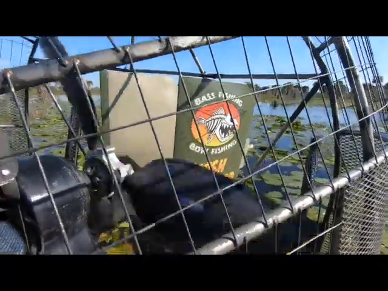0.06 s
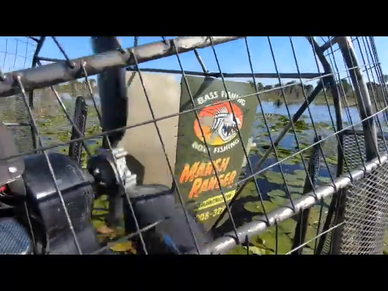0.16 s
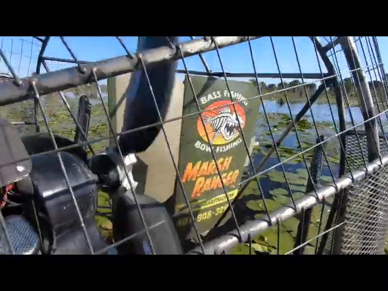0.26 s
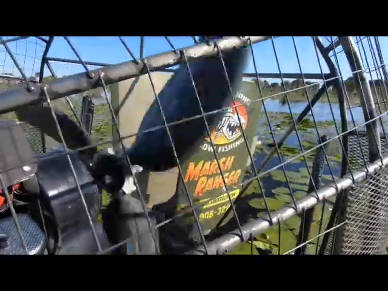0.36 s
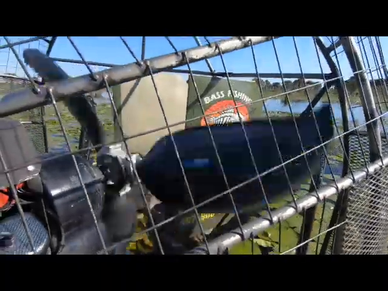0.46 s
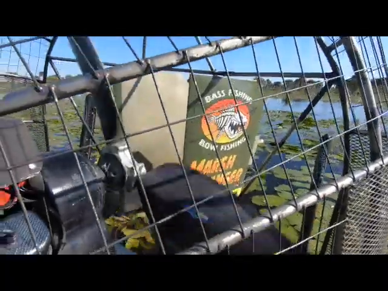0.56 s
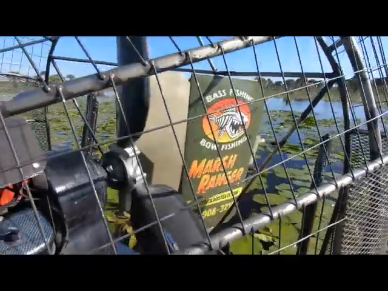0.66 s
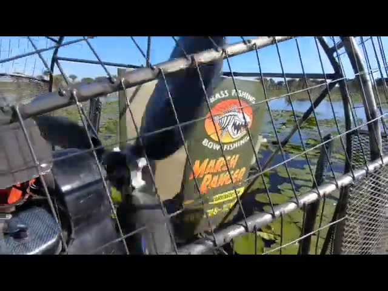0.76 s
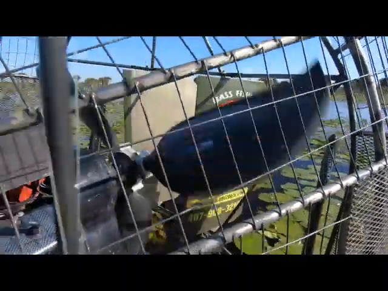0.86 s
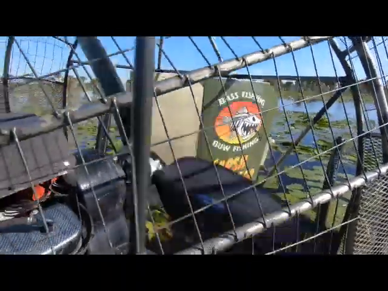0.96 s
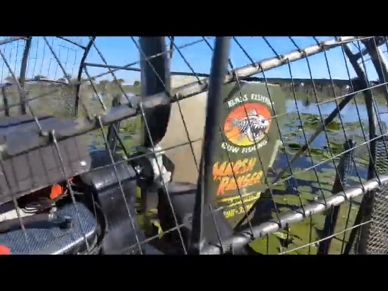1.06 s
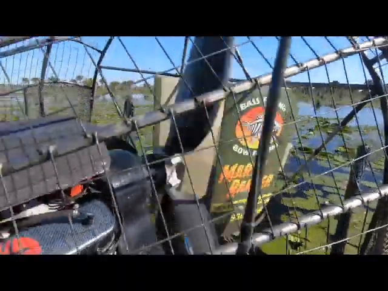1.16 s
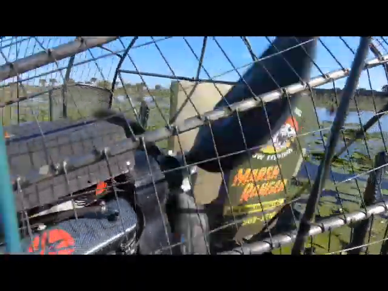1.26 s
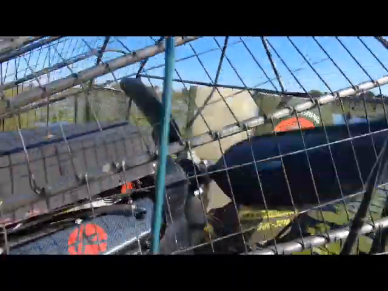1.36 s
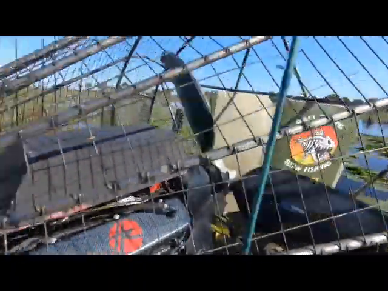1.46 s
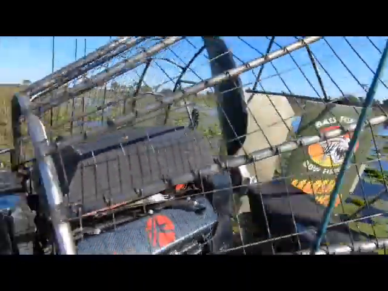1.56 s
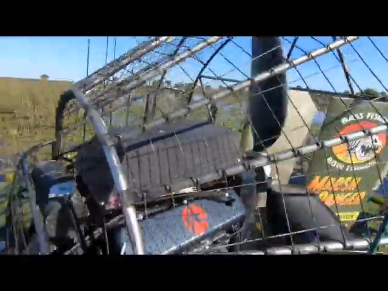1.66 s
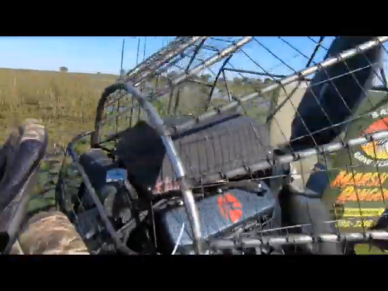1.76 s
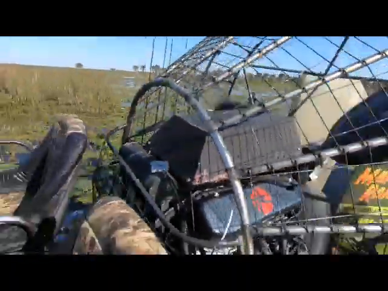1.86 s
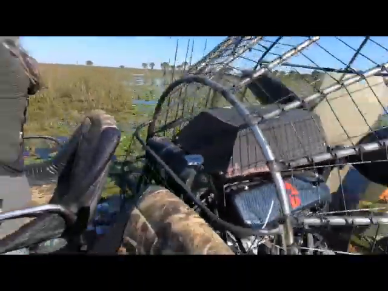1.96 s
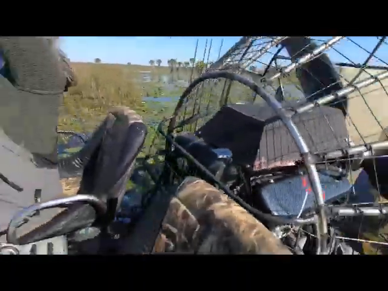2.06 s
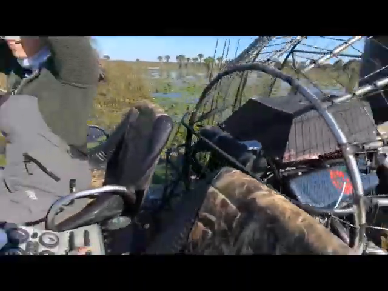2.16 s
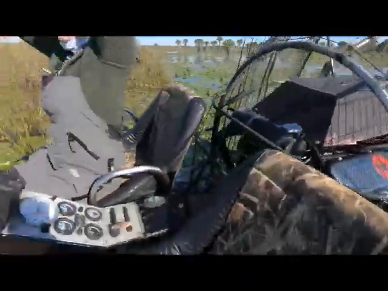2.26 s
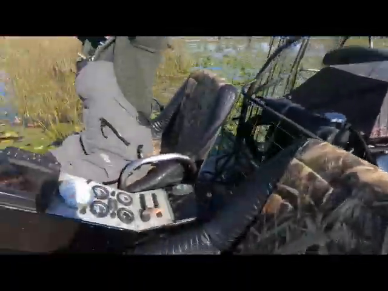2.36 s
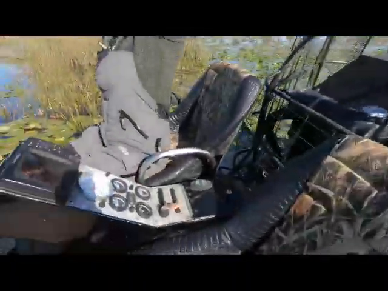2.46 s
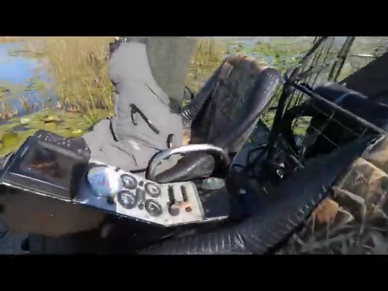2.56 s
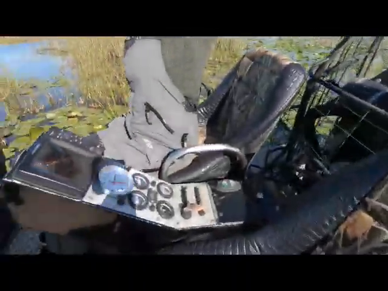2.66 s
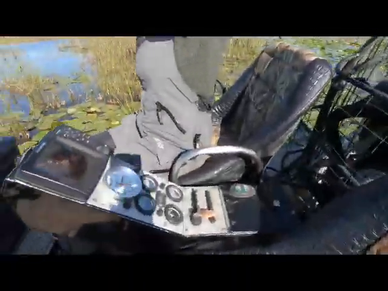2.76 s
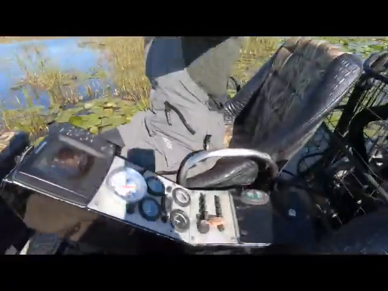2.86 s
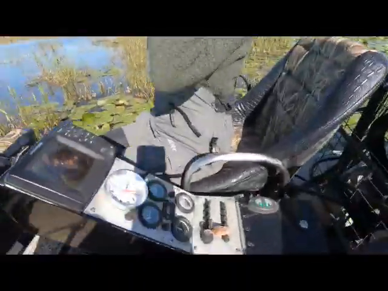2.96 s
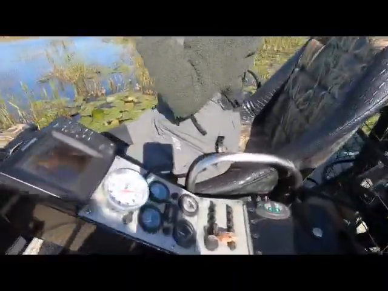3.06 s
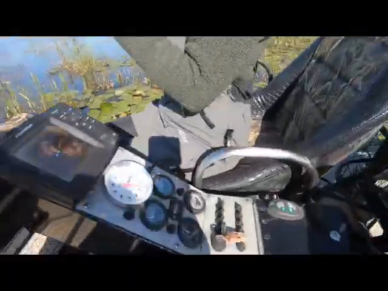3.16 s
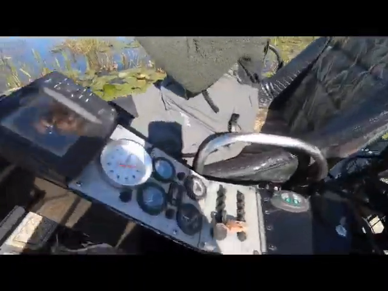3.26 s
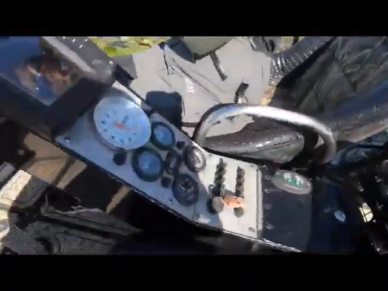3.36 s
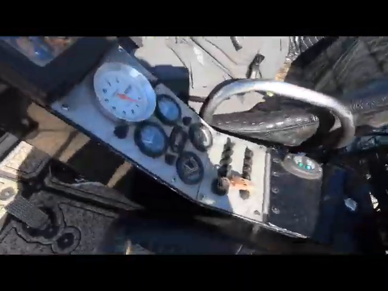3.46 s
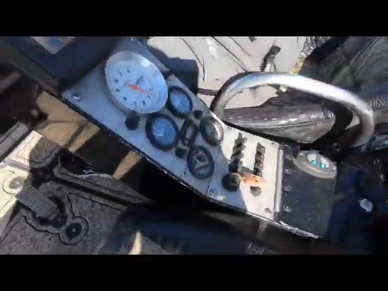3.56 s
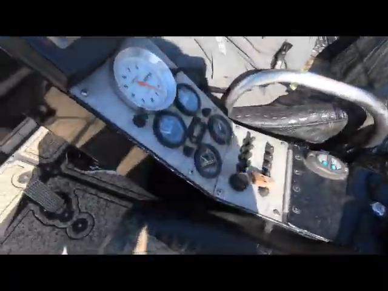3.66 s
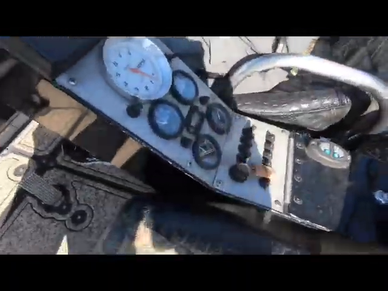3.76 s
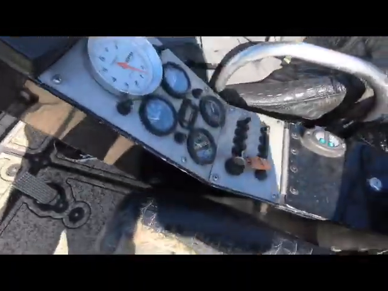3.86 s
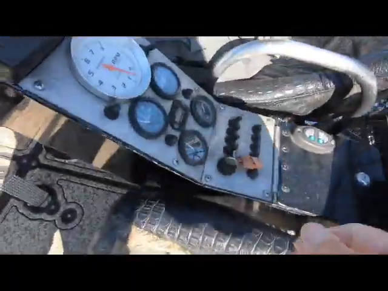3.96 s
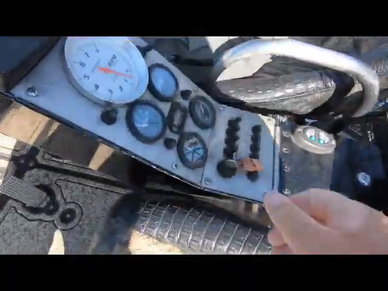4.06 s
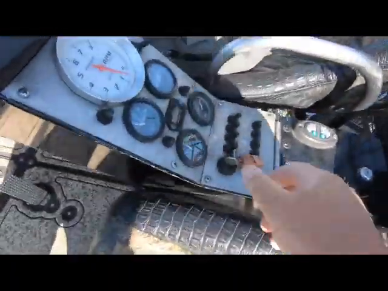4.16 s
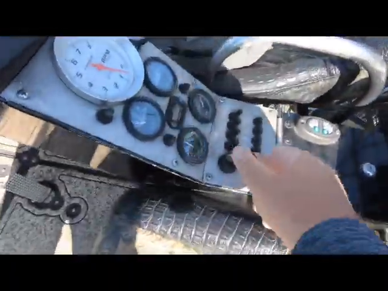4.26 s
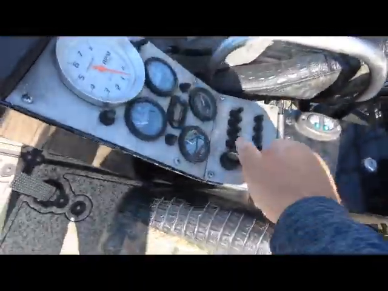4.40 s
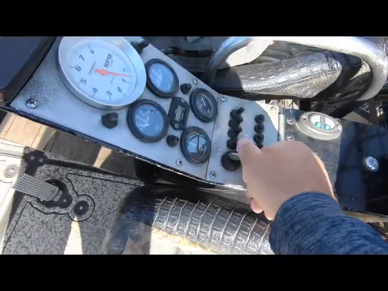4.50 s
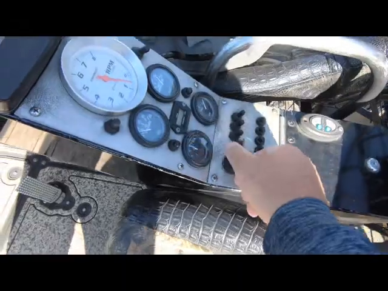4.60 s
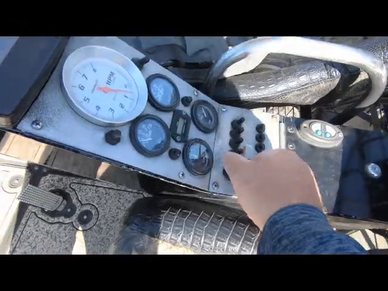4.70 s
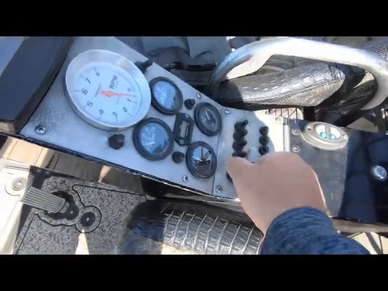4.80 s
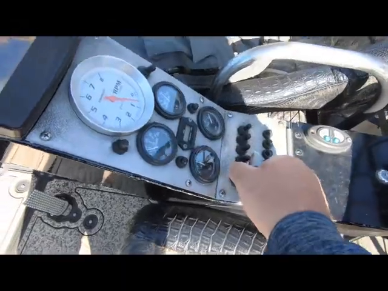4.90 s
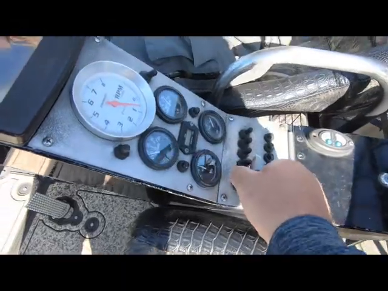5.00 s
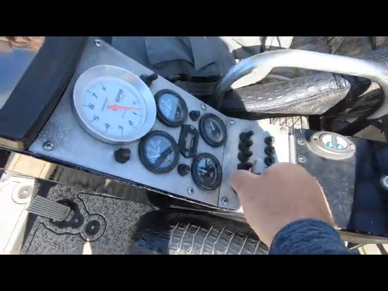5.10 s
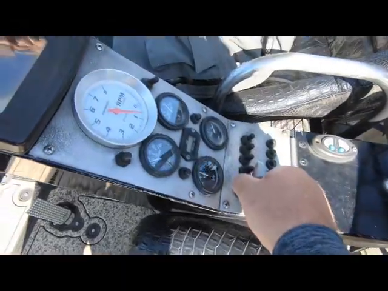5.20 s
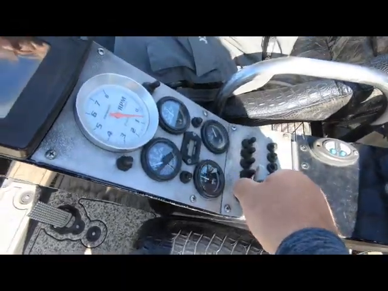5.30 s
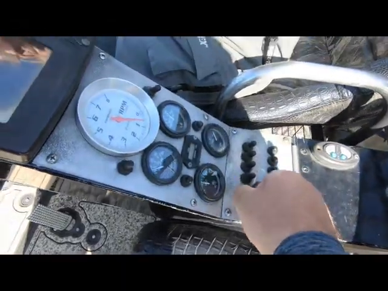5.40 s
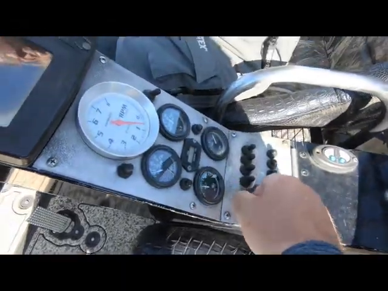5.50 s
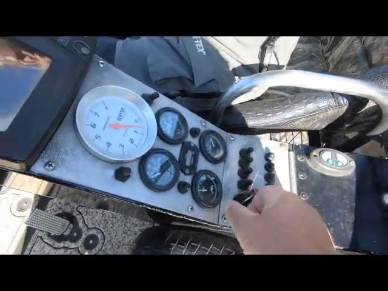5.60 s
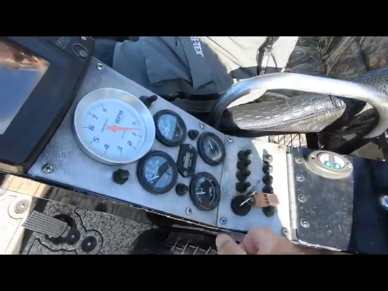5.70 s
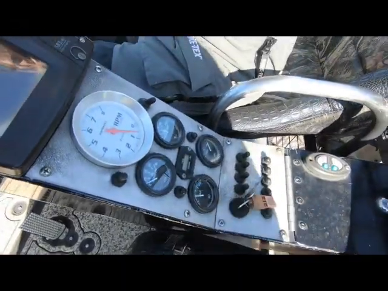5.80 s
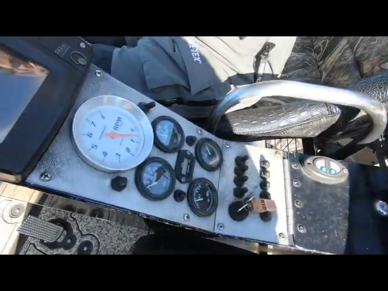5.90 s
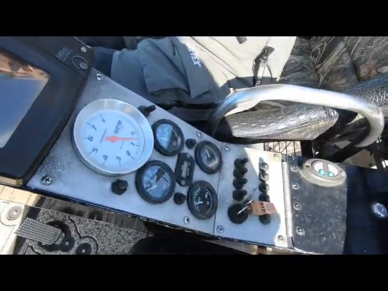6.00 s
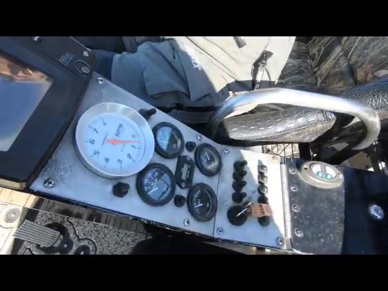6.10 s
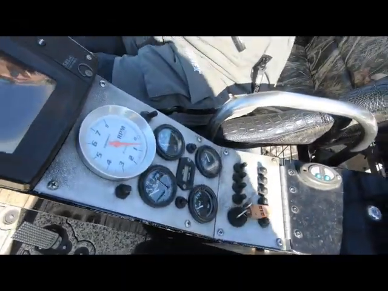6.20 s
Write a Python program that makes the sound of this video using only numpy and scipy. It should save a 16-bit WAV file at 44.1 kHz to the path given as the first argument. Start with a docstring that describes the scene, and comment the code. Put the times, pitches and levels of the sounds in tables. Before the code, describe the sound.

Close, uneven chugging of a large open-exhaust engine with metallic clatter and small squeaks, cut after five seconds and winding down in soft slowing puffs.

```python
"""Airboat V8 idling and running down

From the seat beside it, a loping V8 idles, then is switched off and pumps air, slower and slower.
Each stroke puffs from the open exhaust, rings the pipes, and gates noise into hull drone, clatter and hiss.
Hard kicks make the propeller drive slip with raspy chirps; a belt hums, valve gear pings, the frame rings,
and a few booms and clicks stand out. The mid-range shifts as the listener turns away from the engine.
"""
import sys
import numpy as np
from scipy import signal
from scipy.fft import rfft, irfft, next_fast_len
from scipy.io import wavfile
from scipy.ndimage import uniform_filter1d

SR = 44100
rng = np.random.default_rng(int(sys.argv[2]) if len(sys.argv) > 2 else 0)


def pcm_store(signal):
    """Save signal as 16-bit PCM."""
    levels = np.round(np.clip(np.atleast_2d(signal), -1, 1) * 32767)
    wavfile.write(sys.argv[1], SR, levels.astype(np.int16).T)


N = 275426
TIME = np.arange(N) / SR

# Idle speed of the crank: start_s, rate [cylinder strokes per second]
IDLE_SPEED = [(0.0, 39.43), (0.34, 36.25), (0.69, 38.22), (1.72, 34.69), (2.06, 37.2), (3.09, 36.33),
              (3.44, 33.79), (3.78, 35.28), (4.12, 34.93), (4.47, 37.44), (4.81, 35.62), (5.5, 36.37)]
OFF_S = 5.41  # the spark is cut
COAST_S, FRICTION_HZ_PER_S = 5.55, 37  # from then on, friction takes this many strokes/s off each second

# The lope: burns swell and sag in waves, three to every sixteen strokes
LOPE_STROKES = 16 / 3
LOPE_CREST_STROKE, LOPE_DEPTH_DB, LOPE_SHARPNESS = 1.6, 6.5, 2.5  # sags are narrower than crests
LURCH_S, LURCH_LATE_STROKE = 0.00289, 1.97  # twice in each wave the strokes run late, then early

# A few cylinders in a row burn badly: centre_s, burn change_db
STUMBLES = [(0.555, -3.5), (0.677, -8), (0.965, -3), (1.29, -3), (2.31, -8), (2.458, -4), (2.597, -3),
            (2.763, -7.5), (3.186, -6), (3.49, -12), (3.67, -2), (3.79, -3.5), (4.112, -8.5), (4.566, -9.5),
            (5.134, -2), (5.295, -6.5)]
STUMBLE_S = 0.021  # half the length of a stumble
# How hard each cylinder rings the pipes, in firing order: level_db
CYLINDER_RING = [-1.5, 1, -1, -1, -3.5, -3, 3.5, -2]
# Slips of the propeller drive: start_s, squeak_db, squeak pitch_hz, rasp_db (both levels before trim)
CHIRPS = [(0.0064, -38, 6800, -37.5), (0.166, -42, 6980, -38.5), (0.464, -40.5, 6590, -40),
          (0.599, -33, 7380, -34), (0.7333, -52, 6830, -45.5), (0.885, -59, 6850, -47),
          (1.0224, -56, 7440, -40), (1.075, -58, 6600, -45.5), (1.324, -59, 6850, -44),
          (1.3794, -40.5, 6470, -43), (1.519, -33.5, 7220, -40), (1.698, -50, 6850, -46.5),
          (1.781, -55, 7060, -44), (1.916, -48.5, 6840, -44), (1.973, -38, 7010, -37.5),
          (2.0541, -40, 6420, -45.5), (2.111, -54, 6500, -47), (2.217, -56, 6800, -47.5),
          (2.245, -48.5, 7400, -50), (2.35, -53, 7100, -42), (2.404, -64, 6470, -47.5),
          (2.653, -60, 6840, -49.5), (2.791, -56, 7000, -48.5), (2.817, -52, 7420, -47),
          (2.844, -54, 7200, -47), (2.95, -63, 7000, -51.5), (3.232, -55, 7000, -47.5),
          (3.2569, -54, 7630, -46), (3.289, -58, 7000, -52.5), (3.5475, -46, 7030, -48),
          (3.579, -48, 6640, -51.5), (3.697, -34.5, 6810, -45.5), (3.888, -53, 7000, -48.5),
          (4.0081, -41, 6540, -53), (4.0655, -41.5, 6880, -53), (4.179, -56, 6830, -49.5),
          (4.606, -58, 7070, -43), (4.807, -47, 6894, -49.5), (4.92, -61, 7100, -50.5),
          (5.06, -60, 7000, -46.5), (5.089, -52, 7060, -44.5), (5.255, -56, 6960, -46),
          (5.3347, -44, 7300, -43.5), (5.362, -52, 7500, -45.5)]

# Colour of the turbulent exhaust flow: freq_hz, level_db
RUMBLE_COLOUR = [(25, -27), (40, -16.5), (52, 11), (60, 0), (70, -1.5), (86, 0.5), (98, 2), (120, 1),
                 (150, -16.5), (220, -43)]
# Colour of the ringing exhaust pipes: freq_hz, level_db
PIPE_COLOUR = [(70, -40), (105, -14), (130, 0.5), (152, -1), (163, 1), (178, -14.5), (198, -5.5),
               (214, -12), (232, -10.5), (260, -26), (450, -48.5)]
# Colour of the hull drone: freq_hz, level_db
HULL_COLOUR = [(170, -1.5), (250, 3.5), (330, 2.5), (385, 2.5), (440, -1.5), (480, 0), (560, -1), (700, -8),
               (900, -19.5), (1500, -18)]
# Hull resonances on top of that colour: pitch_hz, width_hz, level_db
HULL_MODES = [(292.3, 24, -4.5), (336, 18, -1), (371.8, 25, -0.5), (414.5, 20, -0.5), (436.5, 18, -11.5),
              (472, 46, -3)]
# Colour of the valve clatter: freq_hz, level_db
CLATTER_COLOUR = [(400, -25), (700, 1), (900, 1), (1300, -7), (1600, -0.5), (2050, -1.5), (2500, -7),
                  (3300, -11.5), (4500, -31.5), (8000, -67)]
# Engine block resonances on top of the clatter: pitch_hz, width_hz, level_db
BLOCK_MODES = [(874, 11, 1.5), (1093, 88, -7), (1517, 29, -7.5), (1960, 33, -16)]
# Colour of the hiss: freq_hz, level_db
HISS_COLOUR = [(2000, -22.5), (3200, -3.5), (4200, 3.5), (5100, 4), (5600, 1.5), (6100, -11), (7000, -21),
               (8800, -26), (10000, -29.5), (15000, -35.5)]
# Colour of the finer sizzle mixed into the hiss: freq_hz, level_db
SIZZLE_COLOUR = [(3000, -15), (5500, -1), (7000, 0.5), (8800, -0.5), (10000, -17.5), (11300, -20),
                 (12400, -4.5), (15000, -19)]
# Colour of the slipping drive: freq_hz, level_db
RASP_COLOUR = [(500, 19.5), (1000, 11), (2000, 8), (3200, 4), (5300, 4.5), (8000, -3), (10000, -13),
               (12500, -10), (15500, -16.5)]

# Partials of the belt drive hum: multiple [of the stroke rate], level_db
HUM_PARTIALS = [(10.8, 0), (13.2, -3)]
# Belt hum against the hull drone: start_s, level_db
HUM_LEVEL = [(0.0, -9), (0.4, -3), (0.7, -13), (1.22, -6), (1.9, -7.5), (2.6, -14), (3.0, -6.5),
             (3.4, -16.5), (4.0, -13.5), (4.3, -5), (4.85, -11.5), (5.06, 0.5), (5.2, -10.5), (5.5, -3.5),
             (5.7, -14)]
# Valve gear pings: pitch_hz, width_hz, level_db
TAPPET_MODES = [(4420, 300, -3.5), (5015, 260, 0.5), (5450, 360, -3)]
# Ringing hull and steel: pitch_hz, width_hz, level_db, power [of the crank speed share]
FRAME_MODES = [(167, 6.9, -42, 0.4), (202, 9.86, -43.5, 0.76), (433, 7.84, -52, 0.31), (905, 10, -65, .3),
               (1976, 29, -76, .3)]
# Booms of the pipes and hull: peak_s, pitch_hz, level_db
BOOMS = [(0.061, 157, -19.5), (0.161, 148, -15.5), (0.495, 148, -17), (0.51, 101, -14), (0.9, 101, -16),
         (0.921, 149, -16.5), (1.05, 148.4, -14), (1.691, 158, -15.5), (1.946, 146, -17),
         (2.134, 164, -13.5), (2.568, 163.3, -14.5), (2.905, 157, -17), (3.479, 157, -16.5),
         (3.592, 158, -17.5), (3.93, 153.7, -15), (4.401, 153.3, -16), (4.67, 153, -17),
         (5.042, 144, -18.5), (5.396, 159, -15.5), (5.488, 155, -18), (5.705, 126, -24), (5.795, 55, -21),
         (5.865, 55, -23), (5.98, 165, -18), (6.181, 64, -27)]
# Small metallic clicks and knocks: start_s, level_db, pitch_hz, width_hz, decay_s
CLICKS = [(5.365, -39.5, 2094, 2600, 0.0072), (5.664, -45, 4750, 5000, 0.0042),
          (5.684, -42.5, 1700, 2400, 0.01)]

# Bass and treble as the engine runs down: start_s, bass_db, treble_db
RUN_DOWN = [(5.62, 0, 0.5), (5.69, 2, 2), (5.79, 2, -0.5), (5.83, 1, -1.5), (5.88, 0, -3), (5.95, 0.5, 2.5),
            (6.065, 2, 2.5), (6.09, -9, -1.5), (6.14, -9, 0.5), (6.19, -5, -0.5)]
# Mid-range as the listener turns from engine to dashboard: start_s, low_mid_db, around_1khz_db
MIDS = [(0.1, -32, -45.5), (0.57, -31.5, -43.5), (1.5, -32, -48), (2.14, -37, -59), (2.85, -39.5, -55.5),
        (3.5, -41, -55.5), (4.1, -41.5, -54.5), (4.72, -37.5, -47), (5.06, -36, -48), (5.22, -37.5, -48.5),
        (5.5, -36, -49.5)]
FACING_DB, FACING_1K_DB = -33, -48  # those two levels when facing the engine
# Layers at the seat, by name: level_db facing the engine, turn_share, power [of the crank speed share],
# unfired_db [change without spark]
MIX = {"exhaust": (-16.5, 0.08, 2, -7), "pipes": (-25, 0.16, 1.4, -0.5), "hull": (-33, 0.875, 1.64, 0),
       "clatter": (-46, .5, 1.3, -1.7), "hiss": (-52.5, 0, 1.47, -1.5), "tappets": (-64, -0.55, 1, -5)}
# The highest treble, above AIR_HZ: start_s, level_db
AIR = [(0.0, 0.5), (2.0, 2), (3.33, -0.5), (3.47, -15), (4.22, -10.5), (4.44, 2.5), (5.35, 2.5), (6.0, 3)]
AIR_HZ = 11200
TOP_HZ = 15400  # nothing much is heard above this


def undb(db):
    """Decibels to gain."""
    return 10 ** (np.asarray(db) / 20)


def unit(x):
    """Scale to rms 1."""
    return x / np.sqrt(np.mean(x ** 2))


def curve(table):
    """Draw a (time, value) table as a line over the whole scene."""
    return np.interp(TIME, *np.transpose(table))


def colour(x, points):
    """Filter by a spectrum of (Hz, dB) points, close to silent outside them."""
    hz, db = np.transpose(points)
    size = next_fast_len(len(x) + SR // 2)
    f = np.maximum(np.arange(size // 2 + 1) * SR / size, 1)
    gain = undb(np.interp(np.log(f), np.log(hz), db, left=-90, right=-90))
    return irfft(rfft(x, size) * gain, size)[:len(x)]


def resonance(x, hz, width_hz):
    """One band-pass resonance, applied twice for steep skirts."""
    b, a = signal.iirpeak(hz, hz / width_hz, fs=SR)
    return signal.lfilter(b, a, signal.lfilter(b, a, x))


def body(x, points, modes):
    """A broad colour with a few resonances on top."""
    ringing = sum(undb(db) * resonance(x, hz, width) for hz, width, db in modes)
    return unit(colour(x, points) + ringing)


def shelf(x, hz, side, s, db):
    """Move the level of everything on one side of a frequency along a curve."""
    part = signal.sosfiltfilt(signal.butter(4, hz, side, fs=SR, output="sos"), x)
    return x + (undb(np.interp(TIME, s, db)) - 1) * part


def swell(t, rise_s, fall_s):
    """An envelope that grows up to t = 0 and dies away after it."""
    return np.exp(np.minimum(t / rise_s, -t / fall_s))


def walk(rate):
    """Smooth random wavering with a spread near 1, stepping about rate times a second."""
    size = int(SR / rate)
    steps = np.repeat(rng.standard_normal(N // size + 1), size)
    return unit(uniform_filter1d(uniform_filter1d(steps, size), size)[:N])


def grit(spread_db):
    """Noise whose level jumps at random every 32 samples, like tiny impacts of unequal size."""
    level_db = spread_db * np.repeat(rng.standard_normal(N // 32 + 1), 32)[:N]
    return unit(rng.standard_normal(N) * undb(level_db))


def pulses(times, sizes):
    """One impulse for each stroke."""
    out = np.zeros(N)
    np.add.at(out, np.clip((times * SR).astype(int), 0, N - 1), sizes)
    return out


def stroke_gate(times, sizes, rise_s, fall_s):
    """An envelope that swells with each stroke."""
    t = np.arange(-SR // 8, SR // 8) / SR
    return signal.fftconvolve(pulses(times, sizes), swell(t, rise_s, fall_s), "same")


def bursts(times, sizes, rise_s, fall_s, depth, pumping=0.44):
    """White noise that swells with each stroke; without spark the flow is more even."""
    gate = stroke_gate(times, sizes, rise_s, fall_s)
    gate = gate / uniform_filter1d(gate, size=SR // 2)
    share = min(depth, 1) * np.maximum(spark(), pumping)
    return (1 + share * (gate - 1)) * rng.standard_normal(N)


def spark():
    """1 while the cylinders burn, fading around the switch-off to 0 when they only pump air."""
    return np.clip((OFF_S + 0.14 - TIME) / 0.19, 0, 1)


def speed():
    """Strokes per second: the wandering idle, then a steady loss to friction."""
    return np.maximum(curve(IDLE_SPEED) - FRICTION_HZ_PER_S * np.maximum(TIME - COAST_S, 0), 1)


def slowing():
    """Crank speed as a share of idle: 1 while running, falling towards 0."""
    return speed() / curve(IDLE_SPEED)


def crank():
    """Strokes completed so far, counted from the middle of the first puff."""
    return np.cumsum(speed()) / SR - .72


def kicked(times, burn_db, lag_s=.006, kick_db=3.5, per_rasp=0.2):
    """The stroke under each chirp is a hard kick: it puffs just after the slip, stronger under a louder rasp."""
    start, _, _, rasp_db = np.transpose(CHIRPS)
    nearest = abs(times[:, None] - start - lag_s).argmin(axis=0)
    times, burn_db = times.copy(), burn_db.copy()
    times[nearest] = start + lag_s
    burn_db[nearest] = kick_db + per_rasp * (rasp_db - rasp_db.mean())
    return times, burn_db


def strokes(jitter_s=0.00082, burn_scatter_db=1.4, ring_scatter_db=2.5):
    """Time, burn and pipe ring of every stroke: crank speed, lope, misfires, hard kicks and a little chance."""
    count = crank()
    index = np.arange(int(count[-1]) + 1)
    times = np.interp(index, count, TIME)
    burning = np.interp(times, TIME, spark())  # no burns, no lope
    sag = abs(np.sin(np.pi * (index - LOPE_CREST_STROKE) / LOPE_STROKES)) ** (2 * LOPE_SHARPNESS)
    lope_db = -LOPE_DEPTH_DB * (sag - sag.mean())
    lag = LURCH_S * np.cos(2 * np.pi * 2 * (index - LURCH_LATE_STROKE) / LOPE_STROKES)
    misfire_db = sum(db * np.exp(-((times - at) / STUMBLE_S) ** 2 / 2) for at, db in STUMBLES)
    cylinder_db = np.array(CYLINDER_RING)[index % len(CYLINDER_RING)]
    time_chance, burn_chance, ring_chance = rng.standard_normal((3, len(index)))
    times = times + burning * lag + jitter_s * time_chance
    times, burn_db = kicked(times, burning * (lope_db + misfire_db))
    burn_db = burn_db + burn_scatter_db * burn_chance
    ring_db = burning * cylinder_db + ring_scatter_db * ring_chance
    return times, burn_db, ring_db


def exhaust(times, burn_db, rise_s=0.0033, fall_s=0.0029, weak_stretch=0.013, rumble_db=-5.5,
            pumping_db=-2.5, echo_s=0.013, echo_db=-16):
    """Each burn pushes out a slug of gas; its rate of change is heard, with a pipe echo and turbulent rumble."""
    out = np.zeros(N)
    for start, db in zip(times, burn_db):
        near = slice(max(int(start * SR) - SR // 20, 0), int(start * SR) + SR // 20)
        t = TIME[near] - start
        width = np.where(t < 0, rise_s, fall_s) * np.exp(-weak_stretch * db)  # weak burns leave more slowly
        out[near] += undb(db) * t / width ** 2 * np.exp(-(t / width) ** 2 / 2)
    out = out + undb(echo_db) * np.interp(TIME - echo_s, TIME, out)
    flow = bursts(times, undb(burn_db), rise_s=0.0036, fall_s=0.049, depth=0.18)
    rumble = unit(colour(flow, RUMBLE_COLOUR))
    puff = undb(2 * pumping_db * (1 - spark()))  # pumped air puffs less and rumbles more
    return unit(unit(out) * puff + undb(rumble_db) * rumble / puff)


def pipes(times, ring_db, scatter_s=0.0017, gas_db=-4):
    """The blow-down of each cylinder rings the pipes, a little early or late, with rushing gas."""
    knocks = pulses(times + scatter_s * rng.standard_normal(len(times)), undb(ring_db))
    gas = bursts(times, undb(ring_db), rise_s=0.0095, fall_s=0.025, depth=0.39)
    return unit(unit(colour(knocks, PIPE_COLOUR)) + undb(gas_db) * unit(colour(gas, PIPE_COLOUR)))


def hum(waver=0.042, flutter_db=5):
    """The belt drive hums at multiples of the stroke rate, wavering at random in pitch and level."""
    rate = speed() * (1 + waver * walk(15))
    phase = 2 * np.pi * np.cumsum(rate) / SR
    tone = sum(undb(db + flutter_db * np.tanh(walk(14))) * np.sin(multiple * phase)
               for multiple, db in HUM_PARTIALS)
    return unit(tone) * undb(curve(HUM_LEVEL))


def turn_db():
    """Level change of the low mid-range as the listener turns, against facing the engine."""
    s, low_db, _ = np.transpose(MIDS)
    return np.interp(TIME, s, low_db) - FACING_DB


def hollow_db(share=0.68):
    """Further change of the clatter around 1 kHz, beyond its share of the turn."""
    s, _, db = np.transpose(MIDS)
    return np.interp(TIME, s, db) - FACING_1K_DB - share * turn_db()


def hull_drone(valves, kick):
    """Each stroke shakes the hull into a resonant drone, joined by the belt hum."""
    shaking = bursts(valves, kick, rise_s=0.006, fall_s=0.016, depth=0.49)
    return unit(body(shaking, HULL_COLOUR, HULL_MODES) + hum())


def valve_clatter(valves, kick, grit_db=1.5, full_db=2):
    """Rough taps ring the engine block, fuller or hollower around 1 kHz."""
    taps = bursts(valves, kick, rise_s=0.0022, fall_s=0.015, depth=0.23) * undb(grit_db * walk(400))
    clatter = body(taps, CLATTER_COLOUR, BLOCK_MODES)
    return unit(clatter + (undb(full_db + hollow_db()) - 1) * resonance(clatter, 1000, 830))


def engine_hiss(valves, hiss_kick, top_kick, sizzle_db=-9):
    """Each stroke swells a band of hiss and a quicker, brighter sizzle."""
    hiss = bursts(valves, hiss_kick, rise_s=0.0024, fall_s=0.014, depth=0.46)
    sizzle = bursts(valves, top_kick, rise_s=0.0017, fall_s=0.0091, depth=0.37)
    return unit(unit(colour(hiss, HISS_COLOUR)) + undb(sizzle_db) * unit(colour(sizzle, SIZZLE_COLOUR)))


def machinery(times, burn_db, hull_scatter_db=5, scatter_db=6):
    """Hull drone, valve clatter and hiss, each kicked by every stroke in its own measure."""
    scatter = np.clip(rng.standard_normal((4, len(times))), -1.5, 1.5)
    hull_kick = undb(.45 * burn_db + hull_scatter_db * scatter[0])
    block_kick = undb(.5 * burn_db + scatter_db * scatter[1])
    hiss_kick = undb(.7 * burn_db + scatter_db * scatter[2])
    top_kick = undb(.9 * burn_db + scatter_db * scatter[3])
    valves = times - .005  # the valves open just ahead of the puff
    return hull_drone(valves, hull_kick), valve_clatter(valves, block_kick), engine_hiss(valves, hiss_kick, top_kick)


def tappets(times, scatter_s=0.0054, scatter_db=4):
    """Each stroke closes two valves, which ping a little differently every time."""
    both = np.repeat(times, 2)
    out = np.zeros(N)
    for hz, width, db in TAPPET_MODES:
        when = both + scatter_s * rng.standard_normal(len(both))
        sizes = undb(scatter_db * (2 * rng.random(len(both)) - 1))
        out += undb(db) * unit(resonance(pulses(when, sizes), hz, width))
    return unit(out)


def frame():
    """Hull and cage ring as sines wavering within narrow resonances, fading more slowly than the crank."""
    out = np.zeros(N)
    for hz, width, db, power in FRAME_MODES:
        phase = 2 * np.pi * np.cumsum(hz + width / 2 * walk(20)) / SR
        out += undb(db + 1.5 * walk(8)) * slowing() ** power * unit(np.sin(phase))
    return out


def throb(throb_db=-30.0, lasts_s=0.25, fade_s=0.09):
    """The engine rocks the deck once a stroke, whatever the burn, and fades out as the crank slows."""
    rocking = np.clip((OFF_S + lasts_s - TIME) / fade_s, 0, 1)
    return undb(throb_db) * rocking * unit(np.sin(2 * np.pi * crank()))


def slips(times, burn_db, level_db=-64, kick=1.5, scatter_db=2.5):
    """Strong burns make the drive slip a little: a faint rasp with no squeak."""
    sizes = undb(kick * burn_db + scatter_db * np.clip(rng.standard_normal(len(times)), -2, 2))
    gate = stroke_gate(times, sizes, rise_s=0.012, fall_s=0.0088)
    return undb(level_db) * unit(spark() * gate * colour(grit(spread_db=6.0), RASP_COLOUR))


def chirps(rasp_trim_db=2.5, squeak_trim_db=-5, squeak_width_hz=130, pair_hz=400, rasp_rise_s=0.0077,
           rasp_fall_s=0.015, judder_db=2.1, squeak_rise_s=0.004, squeak_fall_s=0.01, tilt_db=3.5):
    """A hard kick makes the drive slip: a juddering rasp of varying brightness around a close pair of squeaks."""
    out = np.zeros(N)
    rasp = unit(colour(grit(spread_db=2.0), RASP_COLOUR))
    bright = resonance(rasp, 8900, 7000)
    judder = unit(undb(judder_db * np.tanh(walk(450))))
    for start, squeak_db, hz, rasp_db in CHIRPS:
        near = slice(max(int(start * SR) - SR // 20, 0), int(start * SR) + SR // 10)
        t = TIME[near] - start - .003
        squeak = unit(sum(resonance(rng.standard_normal(len(t)), hz + side * pair_hz, squeak_width_hz)
                          for side in (-.5, .5)))
        tilt = undb(tilt_db * (2 * rng.random() - 1))
        scrape = rasp[near] + (tilt - 1) * bright[near]
        out[near] += undb(rasp_db + rasp_trim_db) * scrape * swell(t, rasp_rise_s, rasp_fall_s)
        out[near] += undb(squeak_db + squeak_trim_db) * squeak * swell(t, squeak_rise_s, squeak_fall_s)
    return out * judder


def booms(rise_s=0.017, fall_s=0.022):
    """One low resonance at a time swells over a stroke or two and dies away."""
    out = np.zeros(N)
    for peak_s, hz, db in BOOMS:
        t = TIME - peak_s
        out += undb(db) * swell(t, rise_s, fall_s) * np.sin(2 * np.pi * hz * t)
    return out


def clicks(rise_s=0.00094):
    """Loose fittings and the ignition key: short ticks and knocks of resonant noise."""
    out = np.zeros(N)
    t = np.arange(SR // 20) / SR
    for start, db, hz, width_hz, decay_s in CLICKS:
        tick = swell(t - rise_s, rise_s, decay_s) * unit(resonance(rng.standard_normal(len(t)), hz, width_hz))
        first = int(start * SR)
        out[first:first + len(t)] += undb(db) * tick
    return out


def run_down(x, bass_hz=110, treble_hz=700):
    """The bass and the treble swell and sag as the crank comes to rest."""
    s, bass_db, treble_db = np.transpose(RUN_DOWN)
    x = shelf(x, bass_hz, "low", s, bass_db)
    return shelf(x, treble_hz, "high", s, treble_db)


def at_seat(x, db, turn_share, speed_power, unfired_db):
    """A layer's level follows the listener's turn, the spark and the slowing crank."""
    level_db = db + turn_share * turn_db() + unfired_db * (1 - spark())
    return x * undb(level_db) * slowing() ** speed_power


def scene():
    """Each stroke drives the exhaust and shakes the machinery; the mix shifts as the listener turns."""
    times, burn_db, ring_db = strokes()
    hull, clatter, hiss = machinery(times, burn_db)
    layers = {"exhaust": exhaust(times, burn_db), "pipes": pipes(times, ring_db),
              "hull": hull, "clatter": clatter, "hiss": hiss, "tappets": tappets(times)}
    engine = sum(at_seat(x, *MIX[name]) for name, x in layers.items())
    boat = run_down(engine + frame()) + throb() + slips(times, burn_db) + chirps() + booms() + clicks()
    return shelf(boat, AIR_HZ, "high", *np.transpose(AIR))[None]


def record(dry, ceiling=0.56):
    """The microphone drops the deepest bass, rounds the loudest puffs and cuts the top."""
    x = signal.sosfiltfilt(signal.butter(4, 27, "high", fs=SR, output="sos"), dry)
    x = ceiling * np.tanh(x / ceiling)
    return signal.sosfilt(signal.ellip(8, .2, 70, TOP_HZ, fs=SR, output="sos"), x)


dry = scene()
out = record(dry)
pcm_store(out)
```